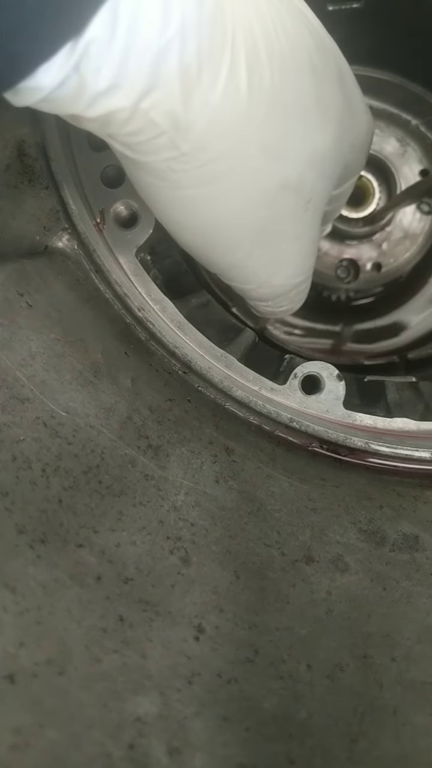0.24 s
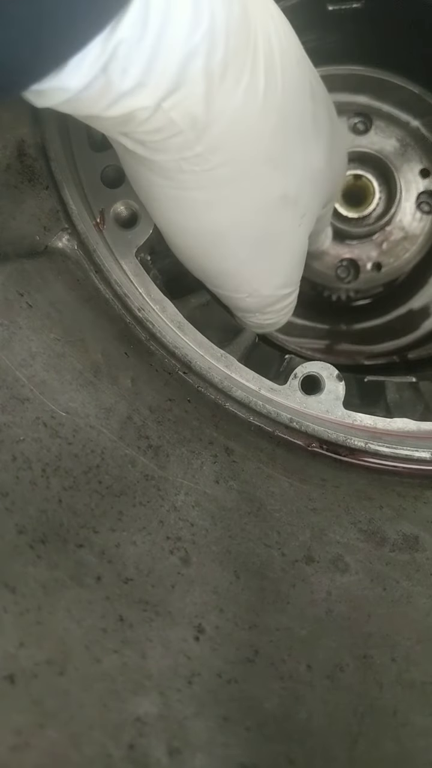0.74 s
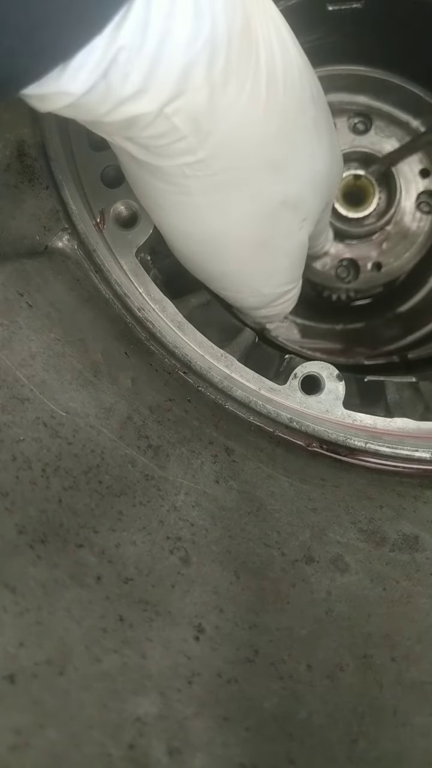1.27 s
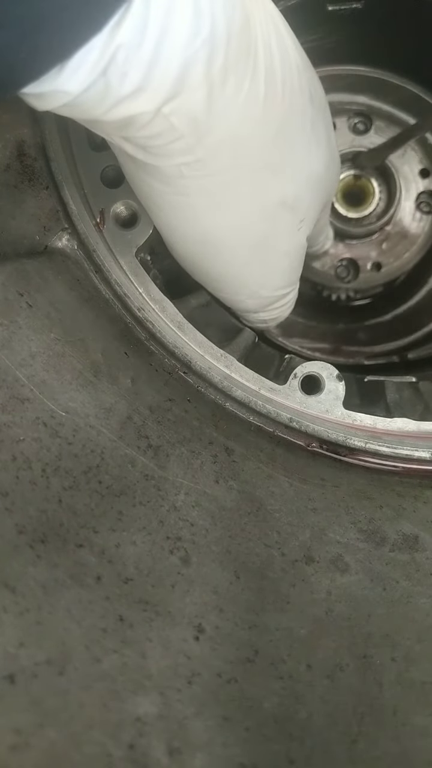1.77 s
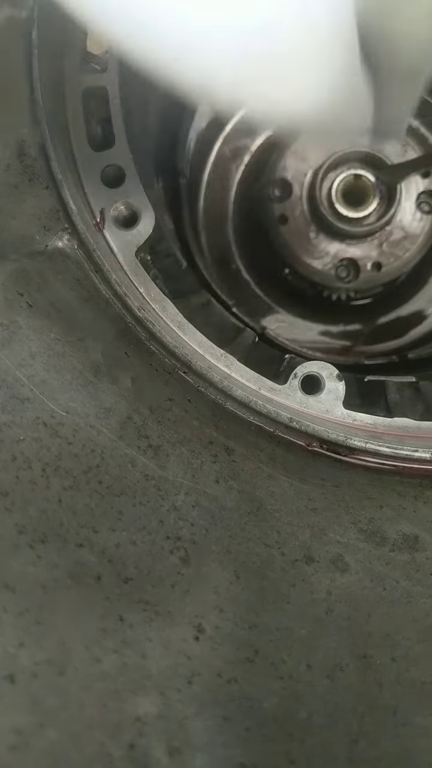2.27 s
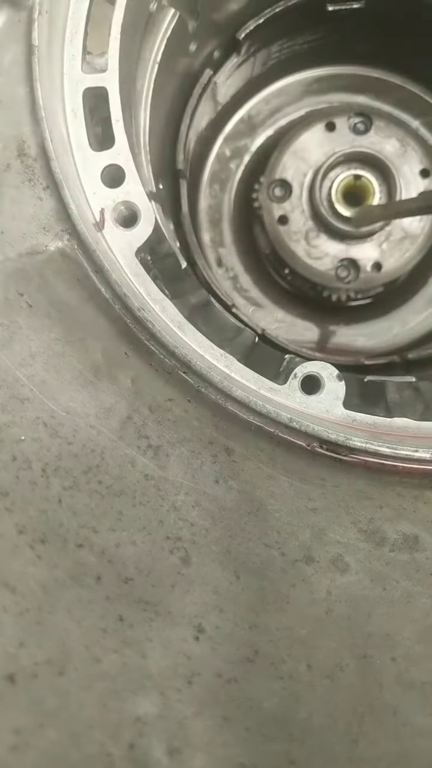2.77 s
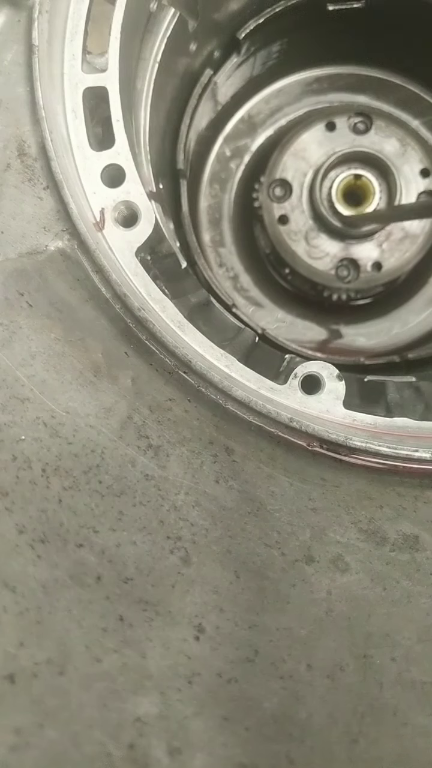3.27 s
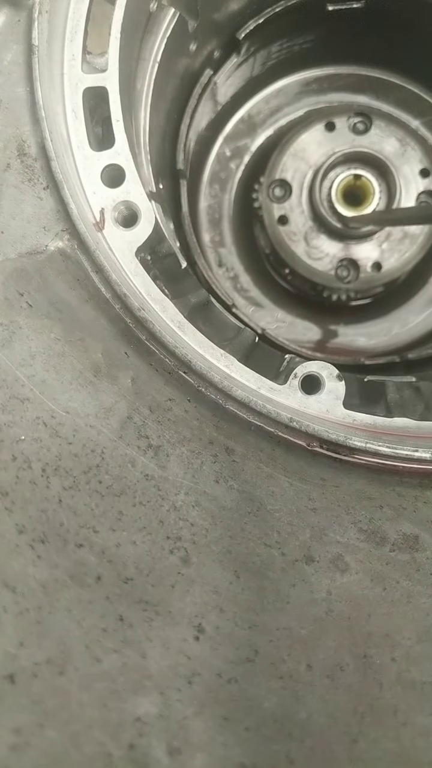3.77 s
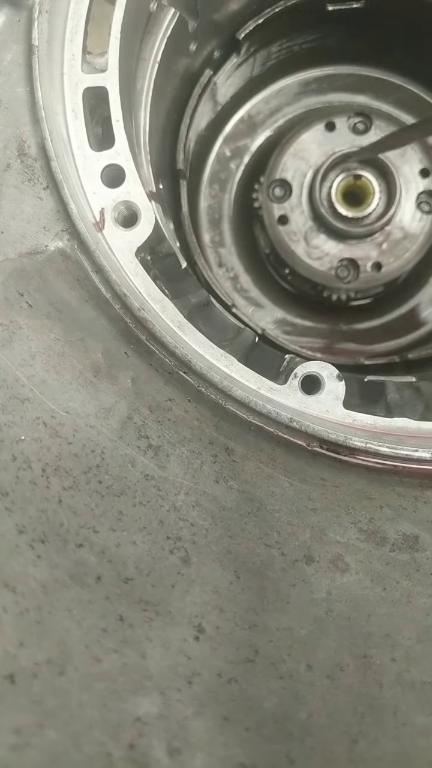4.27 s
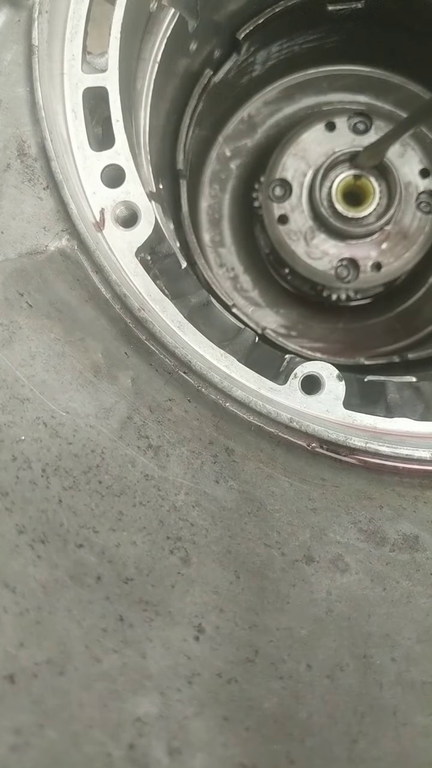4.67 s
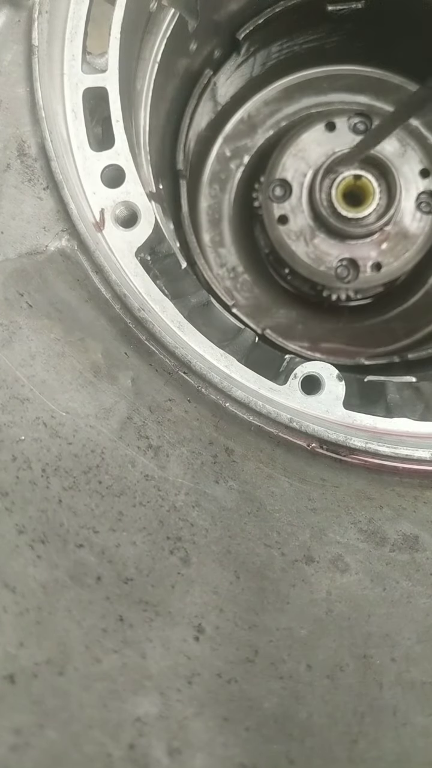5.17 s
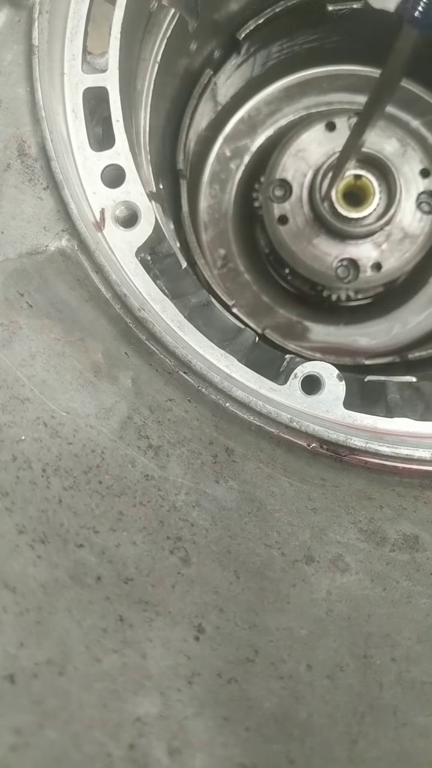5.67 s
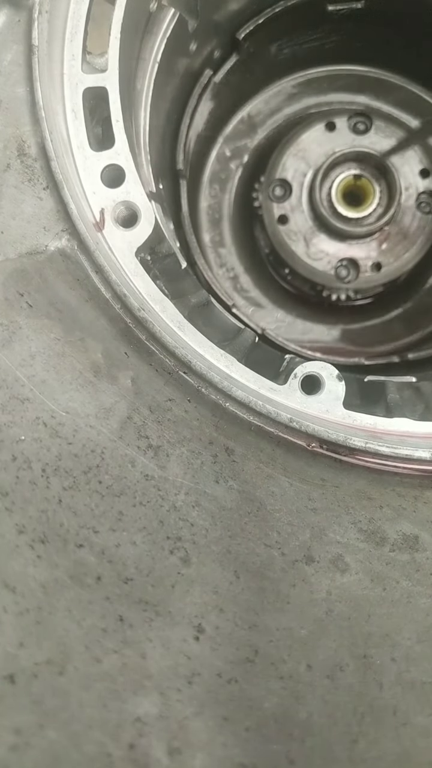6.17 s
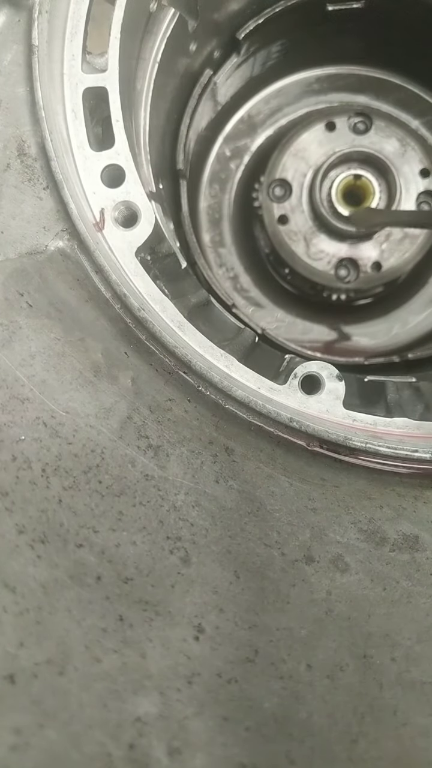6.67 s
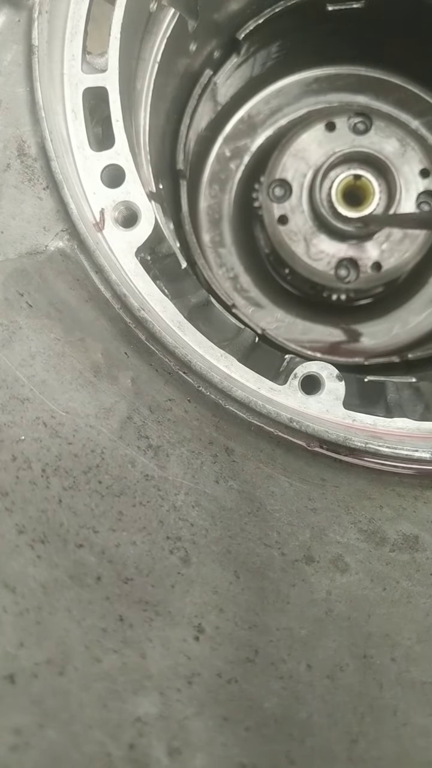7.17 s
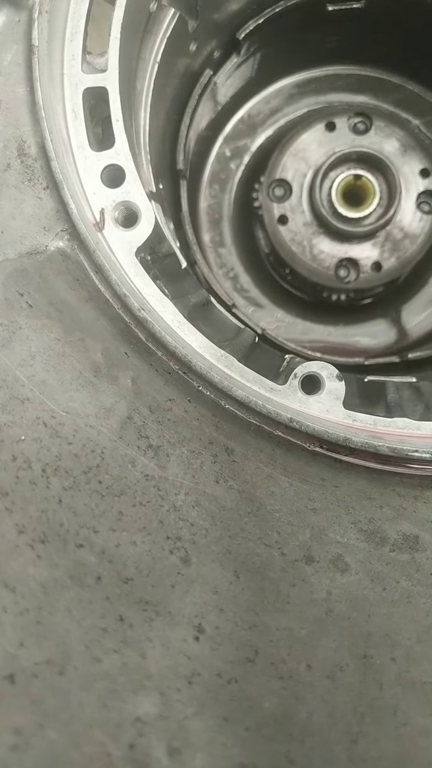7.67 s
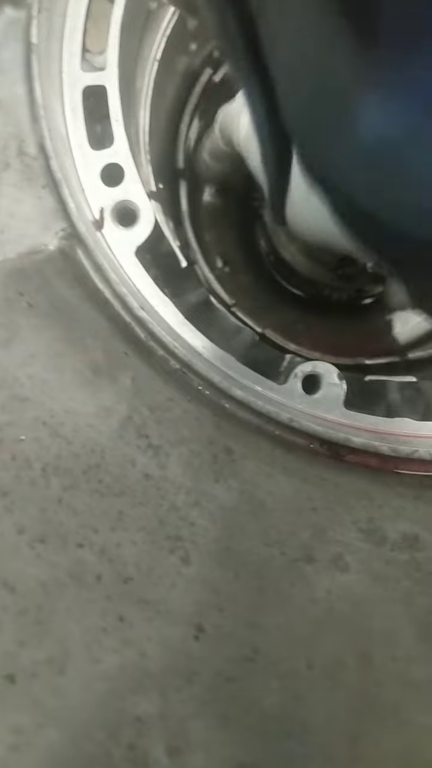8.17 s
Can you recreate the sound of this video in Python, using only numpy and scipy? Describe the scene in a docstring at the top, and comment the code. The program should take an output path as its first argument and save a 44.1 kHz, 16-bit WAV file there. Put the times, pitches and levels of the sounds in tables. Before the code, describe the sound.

Close, irregular bright metal clicks and short gritty scrapes as a steel pick works a snap ring inside a hollow cast housing.

```python
"""In a quiet workshop, heard close to a phone, a steel pick works a snap ring into its groove in a cast housing.
Clicks are sharp blows, scrapes are bursts of stick-slip; both are noise and pulses filtered by the metal.
The tool rings briefly, the housing hums under each knock, and a few single modes sing on as pings.
Light rubbing, made of grit noise and tiny catches, runs between the contacts over soft air and rumble."""
import sys
import numpy as np
from scipy import signal
from scipy.fft import rfft, irfft, next_fast_len
from scipy.io import wavfile
from scipy.ndimage import uniform_filter1d, minimum_filter1d, map_coordinates

SR = 44100
rng = np.random.default_rng(int(sys.argv[2]) if len(sys.argv) > 2 else 0)


def master(y):
    """Save y as 16-bit WAV."""
    cut = np.clip(np.atleast_2d(y).T, -1, 1)
    pcm = np.round(cut * 32767)  # scale
    wavfile.write(sys.argv[1], SR, pcm.astype(np.int16))


N = 371760  # samples


def amp(db):
    """Decibels to gain."""
    return 10 ** (np.asarray(db) / 20)


def unit(x):
    """Scale to rms 1."""
    return x / np.sqrt(np.mean(x ** 2) + 1e-20)


def norm(x):
    """Scale to energy 1."""
    return x / np.sqrt(np.sum(x ** 2) + 1e-20)


def noise(length):
    """White noise."""
    return rng.standard_normal(length)


def decay(t, t60):
    """A fade of 60 dB in t60 seconds."""
    return amp(-60 * t / t60)


def along(points, hz):
    """Read (Hz, value) points on a log frequency axis."""
    point_hz, values = np.transpose(points)
    return np.interp(np.log(hz + 1), np.log(point_hz), values)


def wobble(rate):
    """A smooth random curve with rate knots a second."""
    knots = noise(int(N * rate / SR) + 4)
    return map_coordinates(knots, [np.arange(N) * rate / SR])


def colour(x, points, tilt=0):
    """Minimum-phase filter with the given spectrum, leaning by Hz ** tilt from 2 to 7 kHz."""
    m = 2 * next_fast_len(len(x) // 2 + 512)
    hz = np.fft.rfftfreq(m, 1 / SR)
    log_gain = np.log(amp(along(points, hz))) + tilt * np.log(np.clip(hz, 2000, 7000))
    # folding the cepstrum onto positive time makes the filter causal
    cepstrum = irfft(log_gain)
    cepstrum[1:m // 2] *= 2
    cepstrum[m // 2 + 1:] = 0
    return irfft(rfft(x, m) * np.exp(rfft(cepstrum)))[:len(x)]


def ring(x, modes, scatter_db):
    """Play x through damped modes whose strengths are drawn anew each time."""
    t = np.arange(min(len(x), SR // 2)) / SR
    hz, db, t60 = np.transpose(modes)[:, :, None]
    strength = amp(db + scatter_db * noise(db.shape))
    answer = np.sum(strength * decay(t, t60) * np.sin(2 * np.pi * hz * t), 0)
    return signal.fftconvolve(x, answer)[:len(x)]


def add(track, s, sound):
    """Mix a sound into the track at s seconds, trimmed to fit."""
    start = round(s * SR)
    sound = sound[:, max(-start, 0):]
    part = track[:, max(start, 0):][:, :sound.shape[1]]
    part += sound[:, :part.shape[1]]


# Steady workshop air. Each row: frequency in Hz, relative level in dB.
AIR_SPECTRUM = [(15, -53), (25, -38), (48, -9), (70, -5.5), (97, -28), (301, -7.5), (335, -10.5),
                (607, -15), (2000, -24.5), (5140, -36), (7110, -21), (8360, -32.5), (16000, -27.5)]
# Handling rumble over time. Each row: time in seconds, level in dB before a random flutter.
RUMBLE_LEVELS = [(0, -59.5), (.6, -53), (1, -59), (1.3, -61.5), (4.7, -61.5), (7.9, -62), (8.1, -53)]


def air():
    """Quiet workshop noise, and a low handling rumble whose level flutters."""
    hush = unit(colour(noise(N), AIR_SPECTRUM))
    rumble_spectrum = [(25, -20.5), (42, -19.5), (58, 1), (80, -6.5), (120, -4.0), (220, -12.5), (500, -46.0)]
    rumble = colour(noise(N), rumble_spectrum)
    rumble = unit(rumble * amp(3.4 * wobble(8)))
    rumble_db = np.interp(np.arange(N) / SR, *np.transpose(RUMBLE_LEVELS))
    return amp(-63) * hush + amp(rumble_db) * rumble


# The workshop's echo. Each row: frequency in Hz, time to fall by 60 dB in seconds.
ROOM_DECAY = [(200, 0.45), (1000, 0.72), (4000, 0.04), (12000, 0.022)]


def room(x):
    """The workshop's tail: decaying noise in which each frequency dies at its own speed."""
    hz, t, bands = signal.stft(noise(SR // 2), SR, nperseg=256)
    fade = decay(t, along(ROOM_DECAY, hz)[:, None])
    tail = signal.istft(bands * fade, SR, nperseg=256)[1]
    late = np.arange(len(tail)) > .006 * SR  # a gap before the echo starts
    return signal.fftconvolve(x, norm(tail * late))[:N]


# How hard the tip rubs along the groove. Each row: time in seconds, level in dB before the hand's wavering.
RUB_LEVELS = [(0.0, -46), (0.45, -60.5), (0.82, -46), (1.15, -52), (1.5, -53), (1.64, -60), (1.9, -63.5),
              (2.16, -48), (2.37, -45.5), (2.56, -60.5), (2.72, -56), (2.93, -41), (3.05, -49),
              (3.22, -52.5), (3.92, -60.5), (4.25, -55), (4.48, -51), (4.69, -63.5), (5.14, -61.5),
              (5.37, -52), (5.71, -58), (6.06, -57.5), (6.22, -37), (6.27, -36.5), (6.55, -56),
              (7.09, -49.5), (7.49, -65.5), (7.73, -69.5), (7.82, -61.5), (8.43, -50.5)]
# The tip slides on around each snap: level re the snap (dB), time to bite in (s), time to ease off (s).
SLIDE_DB, SLIDE_IN_S, SLIDE_OUT_S = -30, 0.0017, 0.048
# The tip sticks and goes quieter just before it snaps: depth (dB), length (s).
STICK_DB, STICK_S = -2, 0.036


def pressure(waver_db=3.0):
    """Strength of the rubbing: the hand's wavering push sticks before every snap and slides on after it."""
    t = np.arange(N) / SR
    near = np.arange(-SR // 5, SR // 2) / SR  # seconds from the snap
    stick = np.exp(-(near / STICK_S) ** 2) * (near < 0)
    slide = np.exp(np.minimum(near, 0) / SLIDE_IN_S - np.maximum(near, 0) / SLIDE_OUT_S)
    around = np.zeros((2, N))
    for s, db, *tone in CLICK_EVENTS:
        slide_power = (amp(db + SLIDE_DB) * slide) ** 2
        add(around, s + near[0], np.array([stick, slide_power]))
    stuck, sliding = around
    push_db = np.interp(t, *np.transpose(RUB_LEVELS)) + waver_db * wobble(15)
    push = amp(push_db + STICK_DB * np.minimum(stuck, 1))
    return np.sqrt(push ** 2 + sliding)


def rubbing(ticks_per_s=45):
    """Fine grit and tiny catches under the sliding tip -> rows (bright sound, low knock)."""
    catches = (rng.random(N) < ticks_per_s / SR) * rng.uniform(0.46, 1, N)
    t = np.arange(SR // 50) / SR
    ticks = signal.fftconvolve(catches, decay(t, 0.019))[:N] * noise(N)
    roughness = amp(3 * wobble(900) + 3.5 * wobble(60))
    grit = unit(noise(N) * roughness) + amp(-7.5) * unit(ticks)
    hiss = unit(colour(grit, SNAP_SPECTRUM))
    hiss += amp(-9) * unit(colour(grit, CLANK_SPECTRUM))
    hiss += amp(-18.5) * unit(colour(grit, SPARKLE_SPECTRUM))
    hiss += amp(-24.5) * unit(ring(grit, STEEL_MODES, scatter_db=12.0))
    low = amp(-8.5) * unit(colour(grit, KNOCK_SPECTRUM))
    return pressure() * np.array([hiss, low])


# Modes of the cast housing. Each row: frequency in Hz, relative level in dB, time to fall by 60 dB in seconds.
HOUSING_MODES = [(222, -13, .11), (307, 0, .12), (360, -4, .25), (592, -7, .14), (630, -3, .21),
                 (826, -4, .2), (917, -6, .21), (1063, -6, .12)]


def housing(knocks, damping_db=1.5):
    """Every knock sets the casting humming; the leaning hand damps each mode now more, now less."""
    hum = np.zeros(N)
    for mode in HOUSING_MODES:
        hum += ring(knocks, [mode], scatter_db=0.5) * amp(damping_db * wobble(5))
    return amp(-1) * knocks + amp(-6.5) * np.std(knocks) * unit(hum)


# One mode sings out after a hard slip or a soft bump.
# Each row: start in seconds, frequency in Hz, level in dB.
PING_EVENTS = [(0.909, 4250, -15), (1.318, 4970, -1.5), (2.482, 1347, -21.5), (3.088, 1367, -19),
               (3.917, 622, -30), (3.93, 826, -34), (4.236, 1364, -18.5), (5.266, 1712, -23),
               (5.332, 1660, -26), (5.371, 1580, -20.5), (5.45, 1640, -31), (5.993, 4100, -9),
               (6.371, 1376, -18.5), (7.291, 1354, -26), (7.697, 2690, -16.5), (7.695, 4230, -8.5),
               (7.893, 363, -29), (8.402, 640, -32)]
PING_CYCLES = 74  # every ping takes this many cycles to fall by 60 dB


def pings():
    """Single modes of the tool's shaft and the housing that outlast their blow; low ones ring longest."""
    track, t = np.zeros((1, N)), np.arange(SR // 2) / SR
    for s, hz, db in PING_EVENTS:
        onset = 1 - np.exp(-t / 0.00031)
        fade = amp(db) * decay(t, PING_CYCLES / hz)
        tone = fade * onset * np.sin(2 * np.pi * hz * t)
        add(track, s, tone[None])
    return track[0]


# Modes of tool and ring. Each row: frequency in Hz, level in dB before random scatter,
# time to fall by 60 dB in seconds.
STEEL_MODES = [(1350, -3, .06), (1710, -8, .07), (2714, -3, .07), (3062, -5, .05), (3698, -4, .06),
               (4184, 0, .05), (4560, -5, .04), (5100, -7, .04), (5935, -5, .05), (6660, -6, .05)]
# Low thud of a contact on the housing. Each row: frequency in Hz, relative level in dB.
KNOCK_SPECTRUM = [(30, -36), (100, -22), (190, -9), (320, 0), (470, -5), (650, -1), (900, -4), (1300, -25),
                  (2500, -70)]
# Mid-range clank of a contact. Each row: frequency in Hz, relative level in dB.
CLANK_SPECTRUM = [(400, -39.5), (850, -5.5), (1350, 1), (1800, -2.5), (2200, 1.5), (3000, -5), (5000, -67)]
# Bright body of a contact, before it leans with brightness. Each row: frequency in Hz, relative level in dB.
SNAP_SPECTRUM = [(1200, -76), (2200, -10), (2800, 0.5), (3700, -0.5), (4200, 5.5), (4800, 4.5), (5500, 0.5),
                 (7000, -0.5), (7700, -7.5), (8500, -20.5), (10000, -59.5)]
# Fine top of a contact. Each row: frequency in Hz, relative level in dB.
SPARKLE_SPECTRUM = [(6000, -27.5), (8500, 1), (10300, 2), (12000, -1), (13200, -7.5), (15700, -4.5)]
# An ordinary contact: brightness (Hz), knock (dB re level).
USUAL_HZ, USUAL_KNOCK_DB = 4418, -12
# A contact that knocks hard also clanks more: usual (dB), dB per dB of knock, dB per octave of brightness.
CLANK_DB, CLANK_PER_KNOCK, CLANK_DB_PER_OCTAVE = -11, 0.37, 6
# A bright contact sparkles more: usual (dB), dB per octave of brightness.
SPARKLE_DB, SPARKLE_DB_PER_OCTAVE = -27.5, 19


def through(force, answer):
    """Play a force through an impulse response, scaled to energy 1."""
    return norm(signal.fftconvolve(force, answer)[:len(force)])


def bore(force, direct_db, t60):
    """Flutter inside the bore: the direct force plus its copy smeared by decaying noise."""
    t = np.arange(len(force)) / SR
    flutter = through(force, noise(len(t)) * decay(t, t60))
    return norm(amp(direct_db) * norm(force) + flutter)


def contact(force, length, db, knock_db, bright_hz, steel_db, tip_db, extra_treble_db=0):
    """A force on the metal excites tip, steel and casting -> rows (bright sound, low knock)."""
    t = np.arange(len(force)) / SR
    octaves = np.log2(bright_hz / USUAL_HZ)
    clank_db = CLANK_DB + CLANK_PER_KNOCK * (knock_db - USUAL_KNOCK_DB) + CLANK_DB_PER_OCTAVE * octaves
    sparkle_db = SPARKLE_DB + SPARKLE_DB_PER_OCTAVE * octaves + extra_treble_db
    snap = bore(force, direct_db=-9.0, t60=0.018)
    # a harder, smaller contact is brighter
    steel = norm(colour(snap, SNAP_SPECTRUM, tilt=4.4 * octaves))
    # the pressed tip has its own short ring
    tip = through(force, decay(t, 0.032) * np.sin(2 * np.pi * .96 * bright_hz * t))
    steel = norm(steel + amp(tip_db) * tip)
    steel += amp(clank_db) * norm(colour(snap, CLANK_SPECTRUM))
    steel += amp(steel_db) * norm(ring(force, STEEL_MODES, scatter_db=16))
    steel += amp(sparkle_db) * norm(colour(snap, SPARKLE_SPECTRUM))
    thud = bore(force, direct_db=-10.5, t60=0.031)
    knock = amp(knock_db - 2) * norm(colour(thud, KNOCK_SPECTRUM))
    # longer contacts carry more energy
    return amp(db) * np.sqrt(length * SR) * np.array([steel, knock])


# The tip skids. Each row: start in seconds, length in seconds, drive level in dB,
# knock drive on the housing in dB re level (before a shared trim), brightness in Hz.
SCRAPE_EVENTS = [(0, 0.0058, -14, -9.5, 5200), (0.253, 0.011, -28.5, -10, 4200),
                 (0.755, 0.031, -33.5, -17.5, 5030), (1.265, 0.11, -38, -19.5, 4400),
                 (1.418, 0.035, -40, -3.5, 4990), (1.882, 0.024, -35, -15.5, 3840),
                 (1.99, 0.029, -39.5, -13.5, 3830), (2.281, 0.08, -40, -20.5, 4700),
                 (2.444, 0.007, -33, -15.5, 4420.0), (2.463, 0.027, -18.5, -11.5, 3940),
                 (2.576, 0.021, -25, -10, 4170), (2.71, 0.018, -9, -21, 4180),
                 (2.753, 0.019, -20, -10.5, 4150), (2.847, 0.024, -16, -20.5, 4100),
                 (2.906, 0.019, -14.5, -21, 4160), (2.97, 0.037, -20, -28.5, 3760),
                 (3.061, 0.028, -12.5, -37.5, 3690), (3.148, 0.03, -11, -35, 4180),
                 (3.212, 0.028, -37.0, -25.5, 4200), (3.367, 0.036, -34, -16, 4620),
                 (3.446, 0.035, -48, -9.5, 4520.0), (3.625, 0.0088, -27, -16, 4650),
                 (4.006, 0.025, -34.5, -5.5, 3450), (4.162, 0.035, -39, -11.5, 3470),
                 (4.342, 0.098, -31, -20, 4600), (5.247, 0.015, -19.5, -33, 5000),
                 (5.319, 0.011, -24, -14, 4870), (5.851, 0.011, -44, 0, 4000),
                 (6.072, 0.0083, -18.5, -29, 5190.0), (6.097, 0.023, -16.5, -12, 5150),
                 (6.184, 0.011, -30.5, -9.5, 4370), (6.203, 0.013, -15.5, -35, 5470),
                 (6.216, 0.09, -35, -30, 4830), (6.339, 0.013, -22.5, -9.5, 4500),
                 (6.357, 0.032, -19.5, -15, 4530), (6.459, 0.025, -25.5, -26, 4770),
                 (6.584, 0.024, -32, -13, 4540.0), (6.747, 0.014, -27, -13, 4400),
                 (6.79, 0.0089, -18, -13, 4430), (6.884, 0.013, -37.5, 3.5, 4830),
                 (6.929, 0.04, -39.5, -23, 5800), (7.075, 0.032, -39.0, -15.5, 5000),
                 (7.191, 0.1, -34.5, -23, 4550), (7.261, 0.026, -27, -27.5, 4300),
                 (7.858, 0.059, -31, -21.5, 5850), (8.21, 0.048, -34.5, -16, 4930)]


def scrapes(slip_hz=290, uneven=0.23):
    """The tip sticks and slips a few hundred times a second, with gritty friction between slips."""
    track, lead = np.zeros((2, N)), SR // 60
    t = (np.arange(SR // 7) - lead) / SR
    for s, length, db, *tone in SCRAPE_EVENTS:
        gaps, sizes = noise((2, 70))
        times = np.cumsum(np.exp(uneven * gaps)) / slip_hz
        slips = np.bincount((times * SR).astype(int), amp(6.9 * sizes), len(t))[:len(t)]
        # the tip bites in, pressure swells through the stroke and lets go at its end
        press = 0.73 + 0.34 * np.sin(np.pi * np.clip(t / length, 0, 1))
        bite = np.minimum(t, 0) / 0.0031
        release = np.maximum(t - length + 0.0025, 0) / 0.0037
        press *= np.exp(bite - release)
        friction = norm(press * noise(len(t)))
        force = norm(press * slips) + amp(-6.5) * friction
        add(track, s - lead / SR, contact(force, length, db, *tone, steel_db=-15.5, tip_db=-8))
    return track


# The ring or the tip snaps against metal. Each row: time in seconds, drive level in dB,
# knock drive on the housing in dB re level (before a shared trim), brightness in Hz.
CLICK_EVENTS = [(0.0161, -13, -31, 5200), (0.047, -29.0, -23, 5520), (0.1422, -18.5, -4.5, 3850),
                (0.386, -15.5, -13.5, 4570), (0.4746, -24, -4.5, 4200), (0.527, -43, 0.5, 3670),
                (0.6187, -21.5, -9.5, 4700), (0.7038, -21.5, -5.5, 4200), (0.7156, -23.5, -12, 4400),
                (0.7427, -30.5, 0, 5150), (0.7621, -25, -12, 4460), (0.8624, -16, -16.5, 4870),
                (0.908, -14, -11.5, 4200), (0.9382, -42, 7.5, 4110), (0.9578, -42.5, 4.5, 4210),
                (1.1114, -35, -9.5, 3960), (1.17, -48.5, -4.5, 3670), (1.2539, -12.5, -27, 5130),
                (1.2666, -21, -5, 5000), (1.316, -20, -8.5, 5130), (1.464, -22.5, -2.5, 4780),
                (1.5832, -17.5, -14, 4310), (1.649, -32.5, -1, 4140), (1.9064, -21.0, -14, 3910),
                (1.9706, -42, 3, 3650), (2.0312, -38.0, -6, 4630), (2.1091, -30.5, -0.5, 3500),
                (2.1772, -34, -17.5, 4000), (2.2714, -34.5, 1, 3770), (2.3382, -33.5, -15, 4470),
                (2.4266, -38, -11, 4200), (2.4797, -21.5, -13.5, 4000), (3.0897, -20, -9.5, 3800),
                (3.184, -22.5, -20, 4420.0), (3.2444, -32.5, -24, 4100), (3.2963, -41.5, -16, 4600),
                (3.5073, -37, -10.5, 4770), (3.5213, -32.5, -21, 4550), (3.6439, -23, -9, 3440),
                (3.694, -39.5, 0, 4530), (3.7556, -44, -22, 4330), (3.915, -28, -4.5, 4320),
                (4.0397, -34, -3, 4080), (4.0504, -20, -7, 4550), (4.177, -24.5, -22, 4300),
                (4.216, -21, -44.5, 4050), (4.2364, -14.0, -19.5, 4500), (4.242, -29, -22.5, 4000),
                (4.3071, -20.5, -38, 4500), (4.3847, -27, -18.5, 4400), (4.4147, -21, -20.5, 4690),
                (4.4219, -22.5, -4.5, 5420), (4.5453, -18, -14.5, 4550.0), (4.633, -32.5, -10.5, 4160),
                (4.8341, -31.5, -7.5, 3240.0), (4.8533, -21, -12.5, 3530), (4.892, -38.5, 6.5, 3730),
                (5.0372, -30, -15, 3560), (5.2101, -39, 3, 3960.0), (5.243, -18.5, -38, 4060),
                (5.264, -14.5, -21, 4610.0), (5.329, -23.5, -6.5, 4660), (5.372, -19, 0, 3970),
                (5.4472, -25, -9.5, 4950), (5.5081, -30.5, -5, 4870), (5.5819, -35.5, -11, 4500),
                (5.6803, -27, 0, 4070), (5.7313, -31, -7.5, 4230), (5.9918, -20.5, -11.5, 4250),
                (6.114, -6, -40.5, 4540), (6.1639, -25.5, -22.5, 4570), (6.174, -17.5, -25, 4800),
                (6.2685, -28, -10, 5000), (6.5969, -16.5, -29, 4200), (6.6416, -30, -2, 4070),
                (6.718, -39, 7.5, 4700), (7.014, -45.5, 6.5, 5150.0), (7.2908, -31.5, -43, 4100),
                (7.695, -18.5, -16.5, 4090), (8.029, -50, 10, 3930), (8.125, -51.5, 0.5, 4060),
                (8.2267, -32, -2.5, 4930)]
# The loudest snaps overload the phone and gain extra treble: from this level (dB), dB per dB above it.
OVERLOAD_DB, TREBLE_PER_DB = -18, 0.7


def clicks():
    """Each snap is a sharp blow with a faint slip before it and a chatter just after."""
    track, lead = np.zeros((2, N)), SR // 100
    t = (np.arange(SR // 14) - lead) / SR
    for s, db, *tone in CLICK_EVENTS:
        slip = norm(noise(len(t)) * np.exp(-np.abs(t) / 0.0032) * (t < 0))
        bounces = noise(len(t)) * rng.exponential(size=len(t))
        chatter = norm(bounces * np.exp(-np.abs(t) / 0.0028) * (t > 0))
        force = (t == 0) + amp(-23.0) * slip + amp(-1.5) * chatter
        treble_db = TREBLE_PER_DB * max(db - OVERLOAD_DB, 0)
        sound = contact(force, 0.0097, db, *tone, steel_db=-20.5, tip_db=-15.5, extra_treble_db=treble_db)
        add(track, s - lead / SR, sound)
    return track


# Thin steel radiates little bass. Each row: frequency in Hz, gain in dB.
THIN_STEEL = [(100, -23.5), (800, 0)]


def scene():
    """Everything sits in the middle; only the treble flickers in width."""
    steel, knocks = clicks() + scrapes() + rubbing()
    work = colour(steel, THIN_STEEL) + housing(knocks) + pings()
    mid = work + amp(-32.5) * room(work) + air()
    width = np.minimum(amp(8.9 * wobble(12)), 2)
    side_spectrum = [(3200, -79), (4600, -56.5), (7000, -37), (15000, -12)]
    side = colour(mid * width * wobble(700), side_spectrum)
    return np.array([mid + side, mid - side])


TOP_HZ = 15900  # upper band limit


def record(dry):
    """The phone's limiter holds the peaks down, and nothing passes its band limit."""
    need = np.minimum(1, .8 / (np.abs(dry).max(0) + 1e-9))
    gain = uniform_filter1d(minimum_filter1d(need, size=61), size=61)
    m = next_fast_len(N + SR // 2)
    passed = np.fft.rfftfreq(m, 1 / SR) < TOP_HZ
    return irfft(rfft(dry * gain, m) * passed, m)[:, :N]


dry = scene()
out = record(dry)
master(out)
```